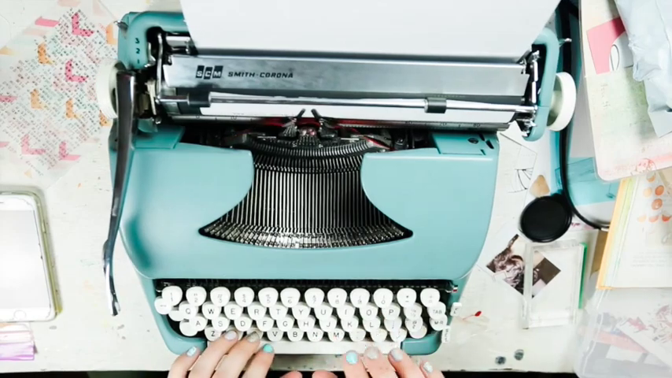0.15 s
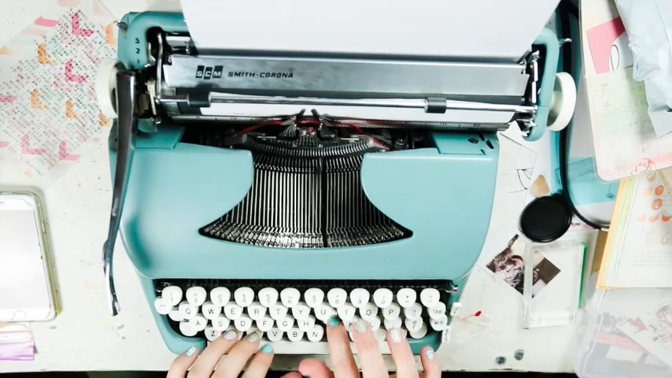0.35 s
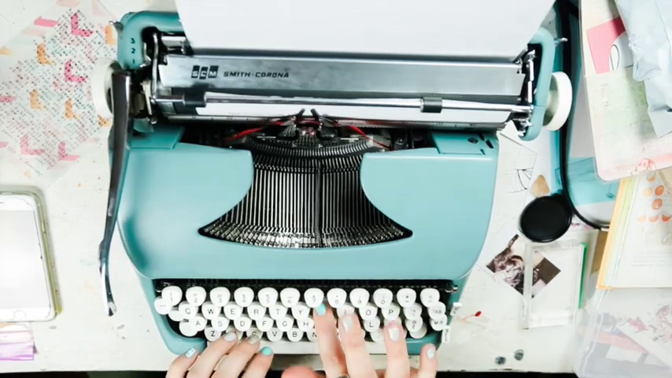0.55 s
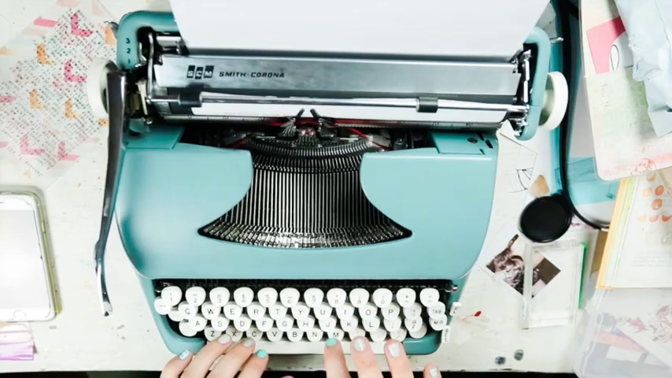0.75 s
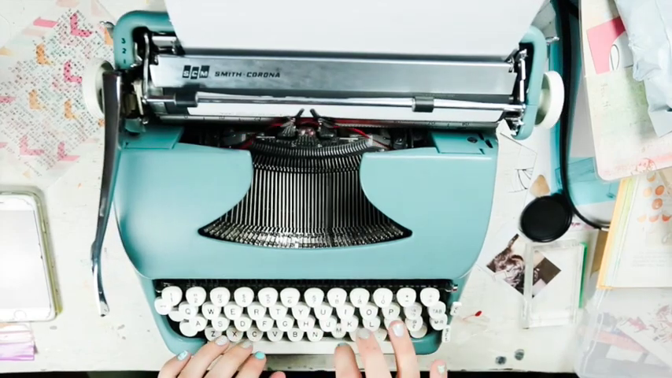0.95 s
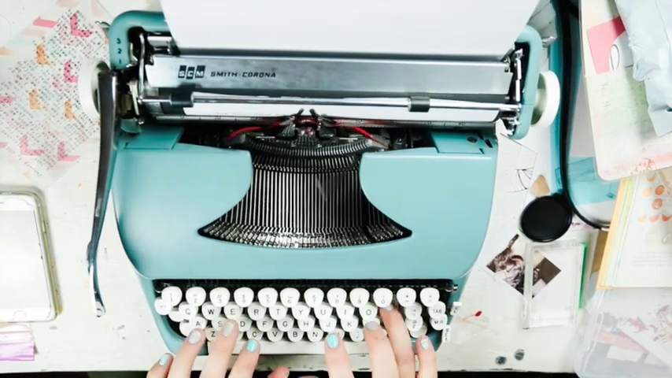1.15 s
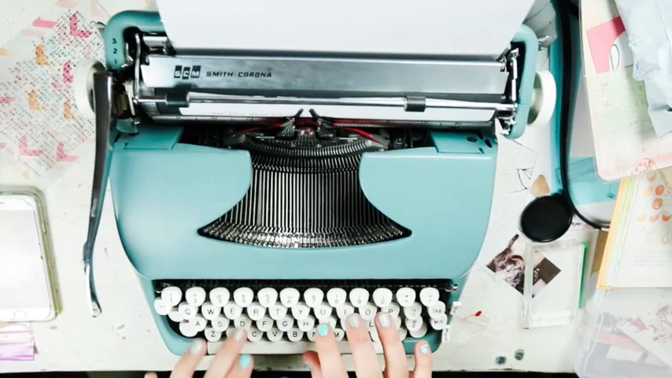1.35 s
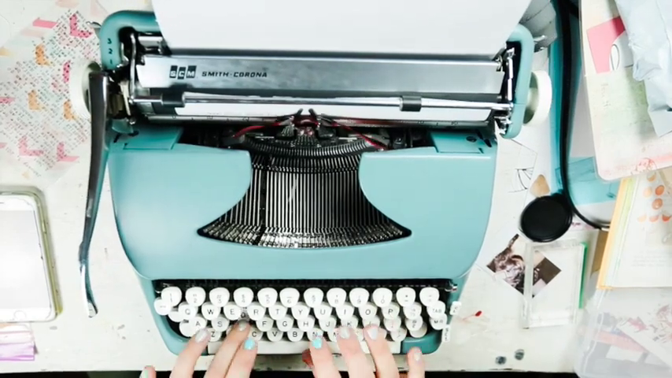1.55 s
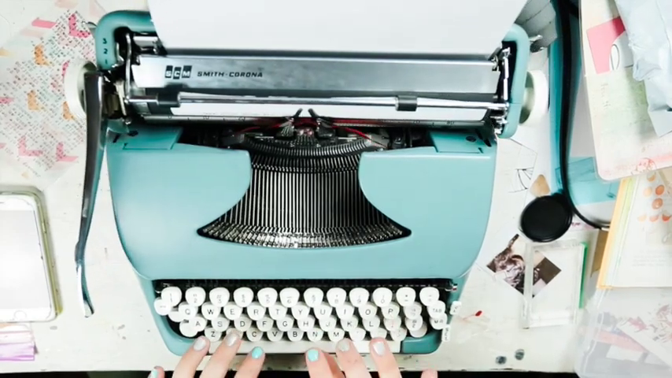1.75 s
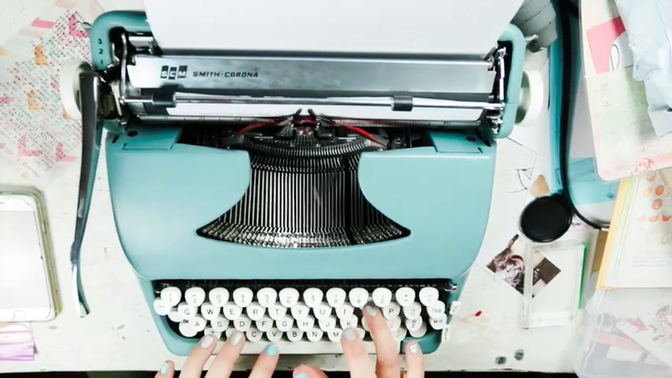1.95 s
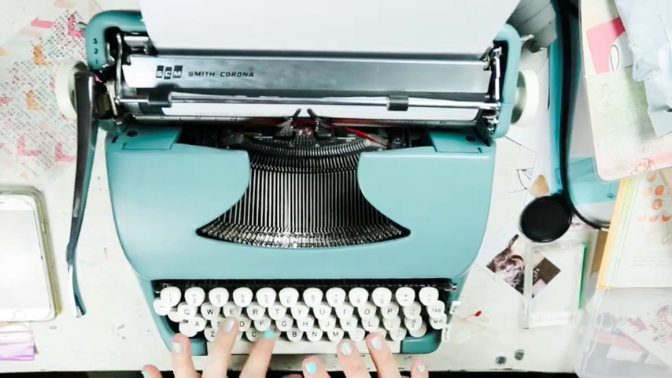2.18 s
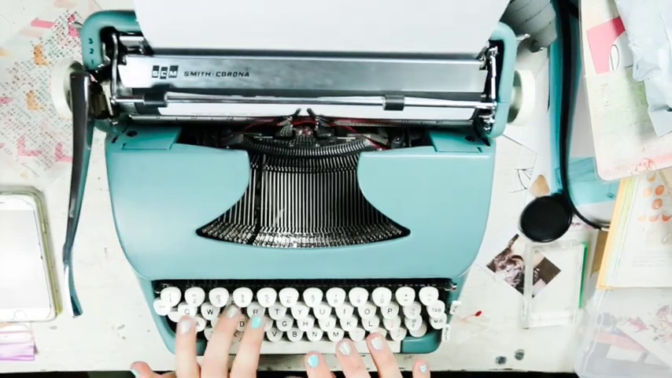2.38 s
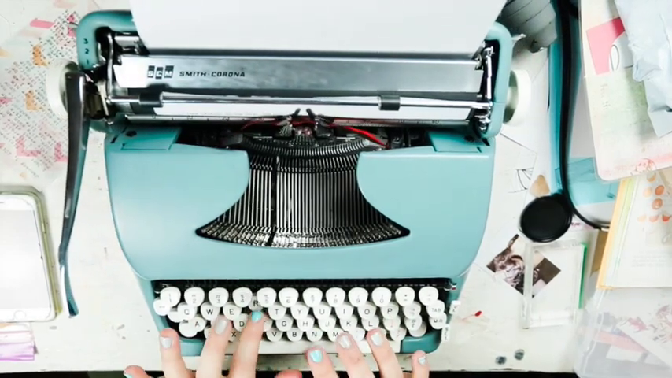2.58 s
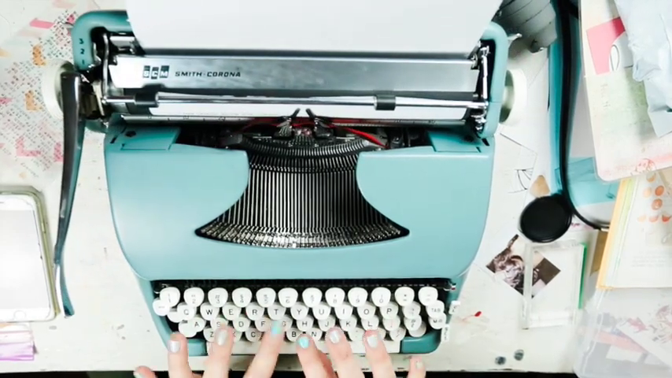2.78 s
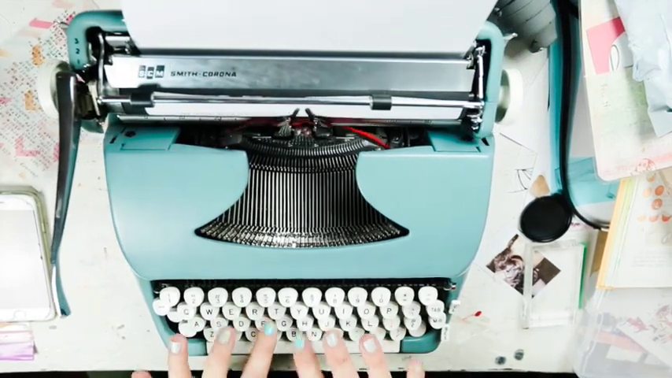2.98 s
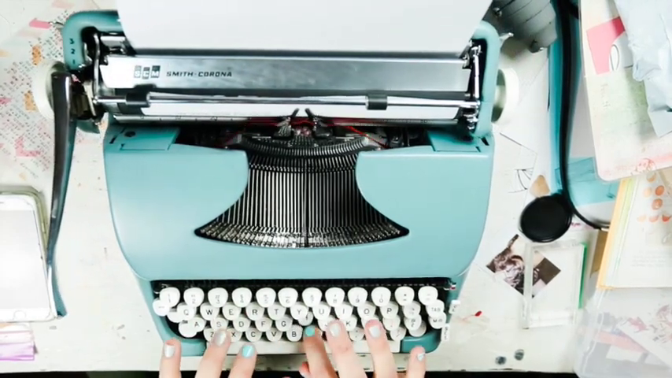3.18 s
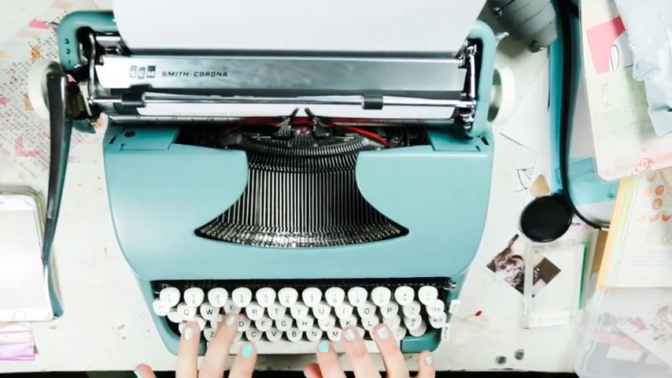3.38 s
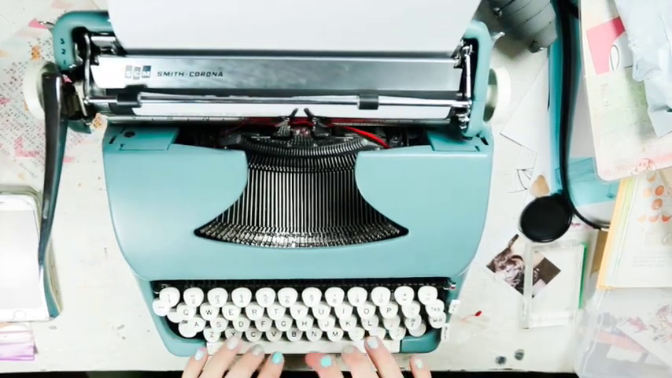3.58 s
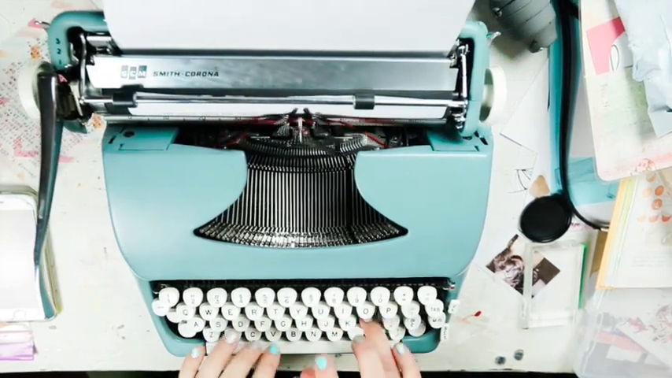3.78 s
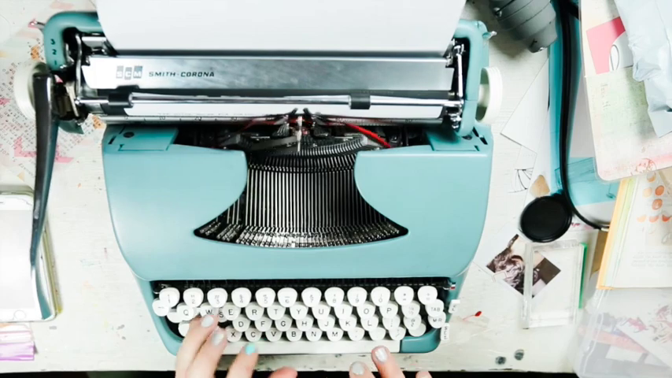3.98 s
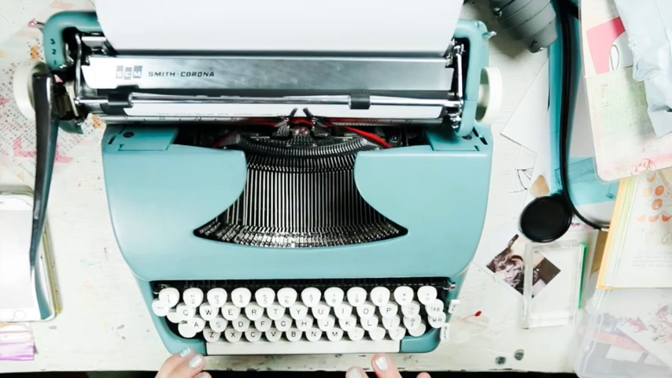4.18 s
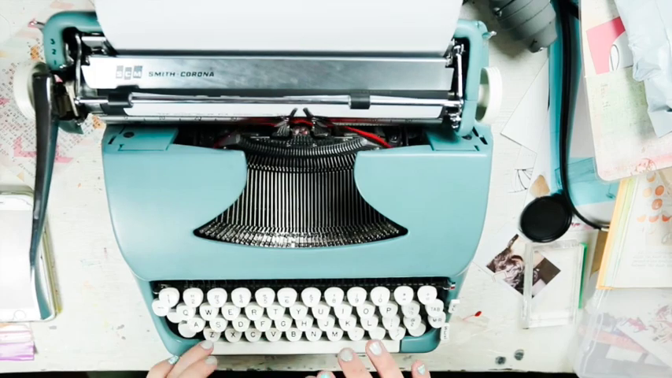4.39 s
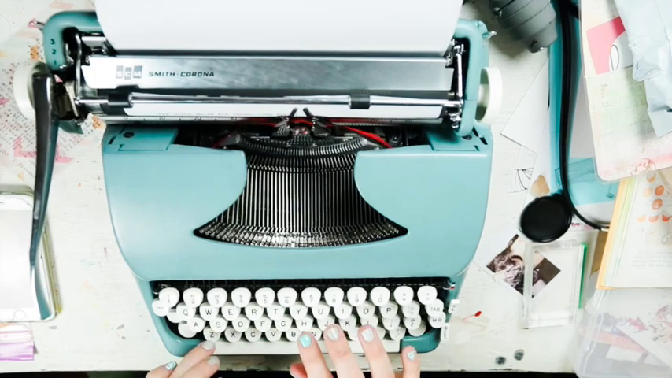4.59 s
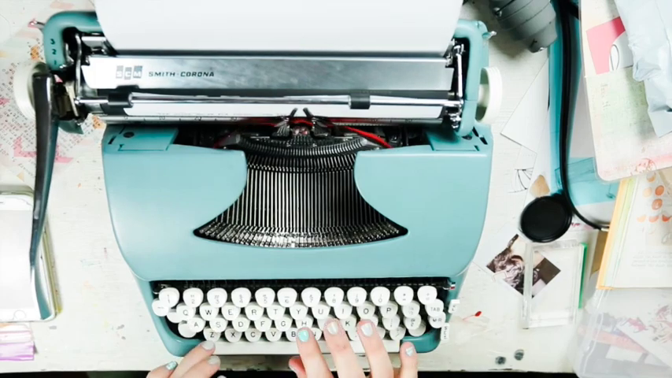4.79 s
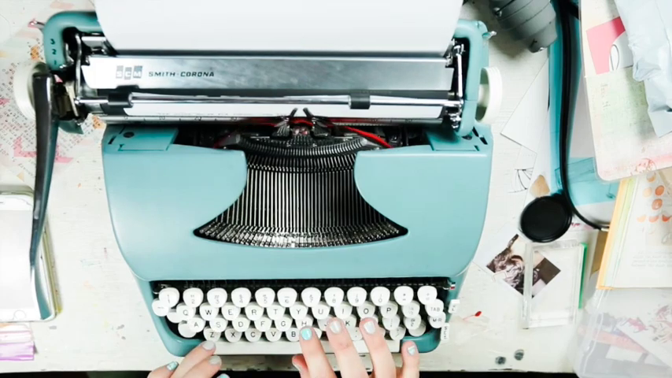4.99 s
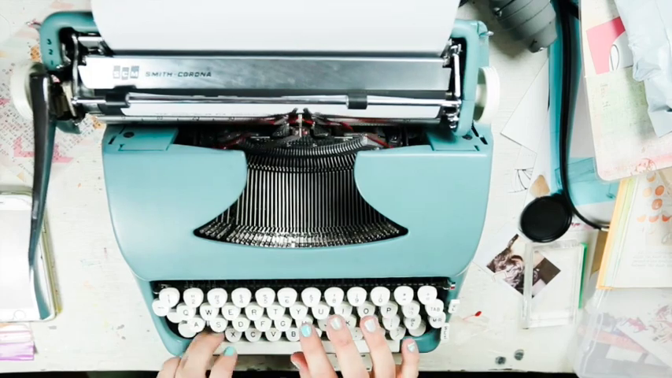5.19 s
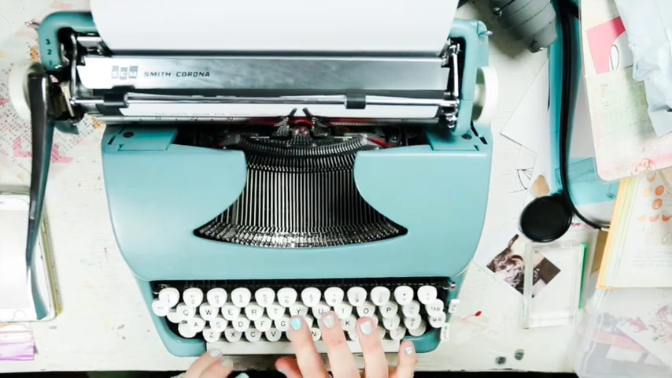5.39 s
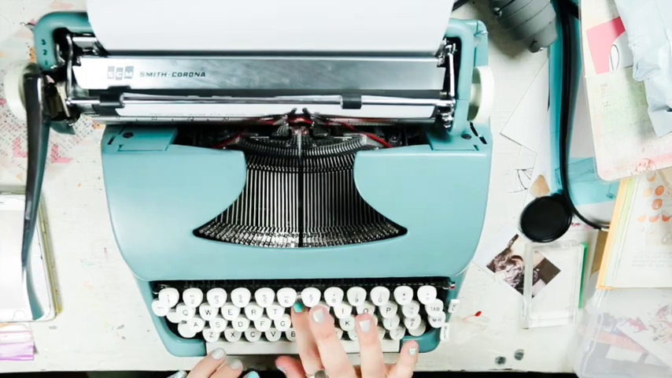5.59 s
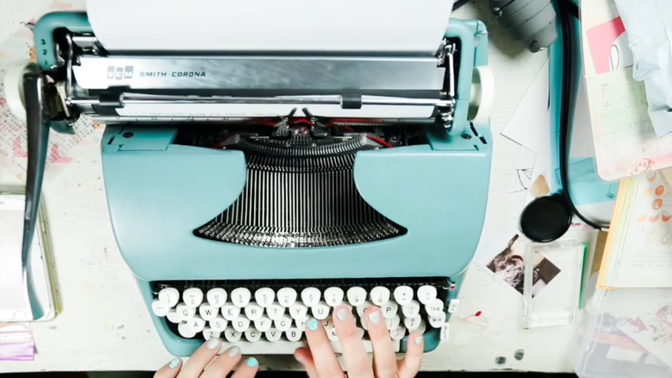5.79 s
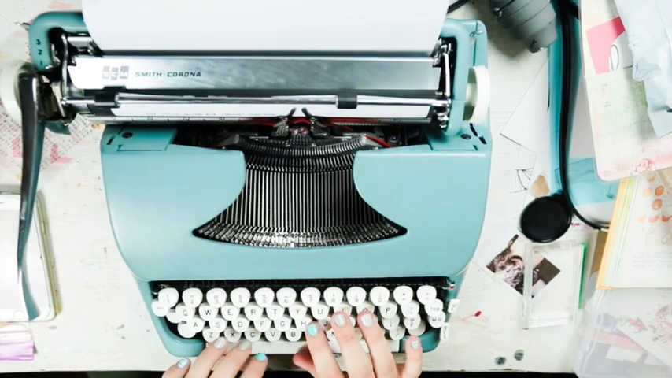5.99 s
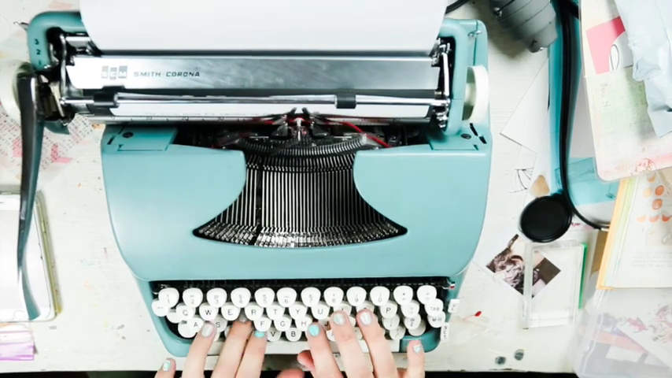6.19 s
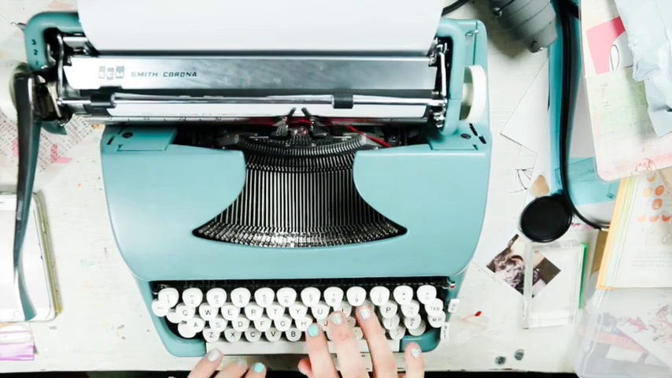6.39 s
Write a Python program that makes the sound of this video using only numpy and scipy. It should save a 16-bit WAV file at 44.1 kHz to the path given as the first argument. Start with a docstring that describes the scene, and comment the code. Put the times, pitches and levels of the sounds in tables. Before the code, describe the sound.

A manual typewriter typed in quick, even runs, each letter a sharp steel crack with lever rattle and a thin metallic shimmer, close in a quiet room.

```python
"""A desk in a quiet room: a portable manual typewriter is typed on in quick runs, heard from close by.
For each letter, loose key levers rattle (random tiny contacts) and a typebar swings up and cracks on the
platen (a smeared click). The basket of steel bars rings on (many close tones), the carriage steps and the
bar drops back. Knocks of the case, thin squeaks and room reflections join in.
The cracks overload the microphone; faint rumble, hum and hiss (shaped noise) fill the pauses."""
import sys
import numpy as np
from scipy import signal
from scipy.fft import rfft, irfft
from scipy.io import wavfile
from scipy.ndimage import uniform_filter1d

SR = 44100
rng = np.random.default_rng(int(sys.argv[2]) if len(sys.argv) > 2 else 0)


def generate_wav(signal):
    """Clip the signal to [-1, 1] and save it as 16-bit WAV at the path in sys.argv[1]."""
    frames = np.transpose(np.atleast_2d(signal))
    scaled = np.clip(frames, -1, 1) * 32767
    pcm = np.round(scaled).astype(np.int16)
    wavfile.write(sys.argv[1], SR, pcm)


N = 284445

# All levels in the tables are relative: the functions add their own gains.
# spectrum of the low rumble: pitch_hz, level_db
RUMBLE_COLOUR = [(25, -38.5), (50, -5), (75, 8.5), (105, 16), (140, 6), (165, 1), (200, -14.5), (290, -30),
                 (345, -9.5), (420, -21.5), (900, -38.5)]
# spectrum of the hiss: pitch_hz, level_db
HISS_COLOUR = [(100, 0.5), (570, 0.5), (900, -2), (2000, -3), (5000, -8), (10000, -11.5), (16000, -17)]
# rise and fall of the rumble: time_s, level_db
RUMBLE_LEVEL = [(0.0, -71.5), (0.68, -63.5), (1.6, -67), (1.94, -64), (2.39, -72), (3.68, -67), (4.51, -71),
                (4.72, -65.5), (5.89, -63), (6.07, -51), (6.23, -60), (6.45, -71)]
# rise and fall of the hiss: time_s, level_db
HISS_LEVEL = [(0, -77.5), (.35, -72), (2, -62), (4.2, -71), (4.45, -83.5), (4.85, -74.5), (5.5, -63.5),
              (5.85, -72), (6.45, -72)]
# wavering hum that follows the rumble: pitch_hz, width_hz, level_db
HUM = [(145, 16, -3), (329, 5, -14), (368, 14, -15), (570, 5, -18)]
# how long the room rings: pitch_hz, t60_s (time to drop by 60 dB)
ROOM_T60 = [(100, 0.45), (1000, 0.64), (5000, 0.53), (15000, 0.22)]
# faint thin squeaks: start_s, length_s, pitch_hz, level_db
SQUEAKS = [(4.72, .16, 1230, -82), (4.8, .19, 2125, -72), (4.84, .19, 1965, -75), (5.72, .24, 4620, -68)]
# tones of the case on the desk: pitch_hz, level_db, t60_s
CASE = [(80, -1, 0.14), (111.7, 2.5, 0.2), (135.2, -1, 0.11), (181, -3, .1), (230, -1.5, .08),
        (384, -6, 0.073), (533.4, 0, 0.14), (574.7, -1.5, 0.16)]
# tones of the stopping carriage: pitch_hz, level_db, t60_s
CARRIAGE = [(520, -3, .08), (575, 0, .11), (630, -4, .07), (115, -2, .18)]
# tones of the steel frame and panels: pitch_hz, level_db, t60_s
FRAME = [(590, -45, .09), (690, -46, .05), (1317, -55, .07), (1517, -49, .08), (1917, -53, .06),
         (2526, -51, .07), (2906, -51, .07), (3290, -46, .07), (3944, -51, .07), (4437, -48, .05)]
# tones of typebar, type guide and platen: pitch_hz, level_db, t60_s
GUIDE = [(6453, -18.5, 0.029), (6560, -27.5, 0.034), (7210, -22.5, 0.026), (7760, -16, .016),
         (8580, -31, 0.03), (8880, -27.5, 0.019), (11600, -18, 0.0075), (14120, -34, .014)]
# spectrum of the lever contacts: pitch_hz, level_db
RATTLE_COLOUR = [(60, -6.5), (300, -7), (600, 4.5), (950, -0.5), (1600, 5), (2600, 6.5), (4500, 3),
                 (7000, 2.5), (10000, -2), (13000, -5.5), (16000, -14)]
# spectrum of the short ticks: pitch_hz, level_db
TICK_COLOUR = [(1000, -19), (4000, -24), (7000, 4), (10000, 3.5), (14500, 3), (16000, 0)]
# spectrum of the blow on the platen: pitch_hz, level_db
CRACK_COLOUR = [(60, -32.5), (300, -21.5), (750, -6), (1200, -15.5), (2600, -1.5), (5000, 1.5),
                (6500, 11.5), (8200, 13.5), (10000, 6.5), (13000, 3), (16000, 0.5)]
# spectrum of the basket of typebars, also of the buzzing type: pitch_hz, level_db
BASKET_COLOUR = [(4000, -23.5), (5800, -10.5), (6500, -1), (7400, 0.5), (8400, -4), (9300, -6),
                 (11500, -10.5), (15000, -25.5)]
# one row per letter, timed by its blow on the platen; travel_s is how long before it the key moves:
# blow_s, force_db, travel_s, key_rattle_db, swing_s, swing_rattle_db
LETTERS = [(.438, 3, .054, -44.5, 0.016, -34), (0.6478, 2.5, 0.045, -54.5, 0.013, -38.5),
           (0.8949, 0, 0.051, -53.5, .023, -44), (1.108, 0.5, 0.051, -57, .012, -49),
           (1.3195, -2, 0.046, -55.5, 0.017, -48), (1.5171, -2.5, 0.038, -70, 0.024, -50),
           (1.933, -6.5, .061, -55.5, 0.023, -45), (2.1145, -1, 0.037, -59.5, 0.01, -41.5),
           (2.3307, -4, .052, -63, .008, -48), (2.5136, -1, 0.042, -63, 0.007, -48.5),
           (2.9056, -1, 0.042, -59.5, 0.0074, -45.5), (3.1206, -1.5, 0.04, -61, 0.019, -52),
           (3.3278, -.5, .036, -58, 0.012, -50.5), (3.7927, -0.5, 0.043, -56.5, 0.01, -49),
           (4.0225, -2, .054, -64.5, 0.015, -54.5), (5.2377, 6.5, .044, -47.5, 0.01, -37.5),
           (5.5714, 6, .049, -52, 0.018, -40), (6.2479, 7, 0.049, -49.5, .023, -37)]
# after each letter the typebar lands on its rest: land_s, rattle_db, tick_db
LANDINGS = [(.56, -51, -43), (.791, -51, -46), (1.022, -51.5, -43.5), (1.26, -50.5, -43),
            (1.473, -61.5, -60.5), (1.661, -57, -51), (2.064, -54, -42.5), (2.259, -56, -53),
            (2.483, -56, -50), (2.684, -57, -50), (3.05, -55.5, -45), (3.27, -55.5, -52.5),
            (3.499, -61.5, -75), (3.937, -55.5, -49.5), (4.177, -55, -50), (5.431, -50.5, -47),
            (5.749, -59.5, -59), (6.412, -49, -50)]
# space bar and other keys that print nothing, going down or coming up: start_s, rattle_db, thud_db
SPACES = [(1.732, -51, -55), (1.815, -51, -63), (1.963, -52, -53), (2.714, -52.5, -55), (2.804, -51.5, -62),
          (3.548, -52, -56), (3.62, -49.5, -62), (4.19, -55.5, -64), (5.887, -46.5, -55.5),
          (5.899, -44, -46.5), (5.932, -40.5, -44.5), (5.979, -50, -55.5), (6.02, -41.5, -54.5)]

T = np.arange(int(.7 * SR)) / SR  # time axis of one short sound, in seconds
CUTOFF_HZ = 16000
LEAD_S = .05  # the sound of a swing is placed this long before its blow
# the carriage stops one letter further on, this long after each blow
CARRIAGE_STOP_S, CARRIAGE_DB, CARRIAGE_THUD_DB = 0.028, -52.5, -58
# as a key is let go the escapement pawl springs back; the typebar lands FALL_S later
FALL_S, PAWL_DB, PAWL_RING_DB = .056, -50.5, -59
# a finger's thud on a key of average rattle, and the share of the rattle's variation that it follows
PRESS_THUD_DB, AVERAGE_KEY_DB, THUD_FOLLOWS = -58.5, -56, 0.66
LANDING_THUD_DB = -4  # relative to the rattle value in LANDINGS
# ticks, relative to the rattle values in LETTERS and SPACES
PRESS_TICK_DB, SPACE_TICK_DB = 8.5, -3.5
# thump and basket ring at a force of 0 dB, and their growth in dB per dB of force
THUMP_DB, THUMP_GROWTH = -53.5, 3.8
BASKET_DB, BASKET_GROWTH = -44, 0.32
# loose levers touch about this often, with this spread of strength
CONTACTS_PER_S, CONTACT_SPREAD_DB = 2800, 3.5


def from_db(db):
    """Turn decibels into a gain."""
    return 10 ** (np.asarray(db) / 20)


def unit(x):
    """Scale to an energy of one."""
    return x / np.sqrt(np.sum(x ** 2) + 1e-20)


def at_hz(points, hz):
    """Read a table between its points, with pitch on a log axis."""
    f, value = np.transpose(points)
    return np.interp(np.log(np.maximum(hz, 1)), np.log(f), value)


def fade(t60):
    """Smooth dying away, 60 dB down after t60 seconds."""
    return np.exp(-np.log(1000) * T / max(t60, 1e-4))


def add(out, s, sound):
    """Mix a sound in at time s."""
    i = max(int(round(s * SR)), 0)
    out[i:i + len(sound)] += sound[:max(N - i, 0)]


def through(x, response):
    """Pass a signal through an impulse response."""
    return signal.oaconvolve(x, response)[:len(x)]


def colour(points, size=4096):
    """Impulse response with the given spectrum, its energy as early as possible (minimum phase)."""
    level_db = at_hz(points, np.fft.rfftfreq(size, 1 / SR))
    cepstrum = irfft(np.log(from_db(level_db)))
    # folding the second half onto the first keeps the response from starting early
    cepstrum[1:size // 2] *= 2
    cepstrum[size // 2 + 1:] = 0
    return irfft(np.exp(rfft(cepstrum)))


def ring(modes, spread_db, detune=0, size=12000):
    """One blow on a set of fading tones; each draws its own strength, sign and any detuning."""
    t = T[:size].astype(np.float32)
    hz, db, t60 = np.array(modes, np.float32).T[:, :, None]
    hz = hz * (1 + detune * rng.normal(size=hz.shape)).astype(np.float32)
    sign = rng.choice([-1, 1], db.shape)
    strength = from_db(db + spread_db * rng.normal(size=db.shape)) * sign
    decay = np.exp(-float(np.log(1000)) * t / t60)
    return np.sum(strength * np.sin(2 * np.pi * hz * t) * decay, axis=0)


def chatter(envelope, per_s, spread_db):
    """Tiny metal contacts at random moments, with the energy of their envelope."""
    n = len(envelope)
    sizes = from_db(spread_db * rng.standard_normal(n)) * rng.choice([-1, 1], n)
    touching = rng.random(n) < per_s / SR
    return unit(sizes * touching * envelope) * np.sqrt(np.sum(envelope ** 2))


def burst(t60, rise):
    """Chatter that builds up quickly and dies away (both times in seconds)."""
    envelope = fade(t60) * (1 - np.exp(-T / max(rise, 1e-5)))
    return chatter(envelope, CONTACTS_PER_S, CONTACT_SPREAD_DB)


def hum():
    """Noise through narrow resonances gives soft tones that waver in pitch and level."""
    out = np.zeros(N)
    for hz, width, db in HUM:
        r = np.exp(-np.pi * width / SR)  # closer to 1 is narrower
        feedback = [1, -2 * r * np.cos(2 * np.pi * hz / SR), r * r]
        tone = signal.lfilter([1, 0, -1], feedback, rng.standard_normal(N))
        out += from_db(db) * tone / tone.std()
    return out


def background():
    """Low rumble, hum and soft hiss: shaped noise, slowly changing in level."""
    time = np.arange(N) / SR
    rumble_gain = from_db(np.interp(time, *np.transpose(RUMBLE_LEVEL)))
    hiss_gain = from_db(np.interp(time, *np.transpose(HISS_LEVEL)))
    rumble = through(rng.standard_normal(N), unit(colour(RUMBLE_COLOUR)))
    hiss = through(rng.standard_normal(N), unit(colour(HISS_COLOUR)))
    low = from_db(-4) * rumble + from_db(-0.5) * hum()
    return rumble_gain * low + hiss_gain * hiss


def room(x, size=32768):
    """Diffuse reflections that build up within a few milliseconds and die soonest in the treble."""
    edges = np.geomspace(60, 17000, num=9)  # Hz
    tail = 0
    for low, high in zip(edges, edges[1:]):
        band_filter = signal.butter(2, [low, high], "band", fs=SR, output="sos")
        band = signal.sosfilt(band_filter, rng.standard_normal(len(T)))
        tail = tail + band * fade(at_hz(ROOM_T60, np.sqrt(low * high)))
    return through(x, unit(tail * (1 - np.exp(-T / 0.0016))))


def squeaks():
    """Thin tones with a wavering pitch that swell and fade."""
    out = np.zeros(N)
    for s, length, hz, db in SQUEAKS:
        waver = 1 + .07 * uniform_filter1d(rng.standard_normal(len(T)), size=60)
        swell = np.sin(np.pi * np.minimum(T / length, 1)) ** 2
        tone = np.sin(2 * np.pi * hz * np.cumsum(waver) / SR)
        add(out, s, from_db(db) * swell * tone)
    return out


def knock(db):
    """One knock of the case against the desk sets the tones of the case ringing."""
    return from_db(db) * ring(CASE, spread_db=2, detune=.03)


def thuds():
    """Fingers, typebars and the stopping carriage knock the case; each blow shoves the whole machine."""
    knocks, shoves = np.zeros((2, N))
    push = T / .00035 * np.exp(1 - T / .00035)  # one smooth push, strongest after 0.35 ms
    for s, force_db, travel, key_db, *_ in LETTERS:
        add(knocks, s - travel, knock(PRESS_THUD_DB + THUD_FOLLOWS * (key_db - AVERAGE_KEY_DB)))
        # the platen passes the blow on to the whole machine
        add(shoves, s + 0.0011, from_db(THUMP_DB + THUMP_GROWTH * force_db) * push)
        stop = ring(CARRIAGE, spread_db=1.5, detune=.015)
        add(knocks, s + CARRIAGE_STOP_S, from_db(CARRIAGE_THUD_DB) * stop)
    for s, db, _ in LANDINGS:
        add(knocks, s, knock(db + LANDING_THUD_DB))
    for s, _, db in SPACES:
        add(knocks, s, knock(db))
    bass_cut = signal.butter(3, 62, "high", fs=SR, output="sos")
    return shoves + signal.sosfilt(bass_cut, knocks)


def pawl():
    """The escapement pawl rings briefly as it springs back, never at quite the same pitch."""
    out = np.zeros(N)
    for s, *_ in LANDINGS:
        hz = 3330 * (1 + .015 * rng.normal())
        steel = ring([(hz, 0, .13), (hz * 2.09, -3, .1)], spread_db=1)
        add(out, s - FALL_S + 0.01, from_db(PAWL_RING_DB) * steel)
    return out


def wind_up(swing):
    """Level of a typebar's rattle just before its blow: it grows as the bar speeds up."""
    progress = (T - LEAD_S) / max(swing, .002) + 1  # 0 as the bar sets off, 1 at the blow
    moving = (progress > 0) * (progress < 1)
    return moving * (.75 + .5 * progress)


def swinging(swing):
    """The dense, even rattle of a typebar on its way up."""
    return chatter(wind_up(swing), per_s=9000, spread_db=2)


def lever(contacts, size=12000):
    """Each lever adds its own quickly dying response to its contacts and passes them to the frame."""
    own = unit((T == 0) + .28 * chatter(fade(.008), per_s=20000, spread_db=1))[:size]
    frame = ring(FRAME, spread_db=1.5, detune=.004)
    response = through(own, colour(RATTLE_COLOUR, size=1024)) + frame
    return signal.fftconvolve(contacts[:size], response)


def linkage():
    """Loose levers rattle as keys move, typebars swing and fall back, and the carriage steps."""
    out = np.zeros(N)
    for s, force_db, travel, key_db, swing, swing_db in LETTERS:
        add(out, s - travel, lever(from_db(key_db + 8.0) * burst(t60=.24, rise=.0035)))
        add(out, s - LEAD_S, lever(from_db(swing_db + 2.5) * swinging(swing)))
        # the blow shakes the levers
        add(out, s, lever(from_db(force_db - 39) * burst(t60=0.047, rise=0.00037)))
        add(out, s + CARRIAGE_STOP_S, lever(from_db(CARRIAGE_DB) * burst(t60=0.22, rise=0.0027)))
    for s, db, _ in LANDINGS:
        add(out, s - FALL_S, lever(from_db(PAWL_DB) * burst(t60=.12, rise=0.0021)))
        add(out, s, lever(from_db(db + 7) * burst(t60=.15, rise=.0021)))
    for s, db, _ in SPACES:
        add(out, s, lever(from_db(db + 7.5) * burst(t60=0.11, rise=0.0016)))
    return out


def latches():
    """Short bright ticks mark key movements and landings; the swinging bar scrapes in its slot."""
    out = np.zeros(N)
    for s, _, travel, key_db, swing, swing_db in LETTERS:
        add(out, s - travel, from_db(key_db + PRESS_TICK_DB) * burst(t60=.055, rise=.001))
        add(out, s - LEAD_S, from_db(swing_db - 1.5) * swinging(.75 * swing))
    for s, _, db in LANDINGS:
        add(out, s, from_db(db + 5.5) * burst(t60=0.055, rise=.00072))
    for s, db, _ in SPACES:
        add(out, s, from_db(db + SPACE_TICK_DB) * burst(t60=0.05, rise=.00072))
    return through(out, colour(TICK_COLOUR))


def basket(count=260):
    """Every blow shakes all the resting typebars: a shimmer of close, slightly different steel tones."""
    crowded = rng.uniform(6200, 8700, count // 2)
    scattered = rng.uniform(4000, 15000, count // 2)
    pitches = np.concatenate([crowded, scattered])  # Hz
    bars = np.exp(2j * np.pi * pitches[:, None] * T).astype(np.complex64)
    out = np.zeros(N)
    for s, force_db, *_ in LETTERS:
        shares = unit(from_db(at_hz(BASKET_COLOUR, pitches)) * rng.rayleigh(1, count))
        phases = np.exp(2j * np.pi * rng.random(count))
        shaken = (shares * phases).astype(np.complex64)
        gain = from_db(BASKET_DB + BASKET_GROWTH * force_db)
        add(out, s, gain * (shaken @ bars).real * fade(t60=0.48))
    return out


def bending_wave(spread_s, size=512):
    """A click that has run along a steel bar: the treble arrives first, the bass last."""
    hz = np.fft.rfftfreq(size, 1 / SR)
    delay = spread_s * (1 - hz / hz[-1])
    return irfft(np.exp(-2j * np.pi * np.cumsum(delay) * hz[1]))


def cracks():
    """The type slug hits the platen, buzzes against it and rings the type guide; hard clicks last longer."""
    contact, buzz, guide = np.zeros((3, N))
    for s, force_db, *_ in LETTERS:
        force = from_db(force_db)
        add(contact, s - .0004, force * 0.56 * bending_wave(0.0013 * np.sqrt(force)))
        add(contact, s + 0.00036, force * 0.063 * chatter(fade(0.014), per_s=21000, spread_db=3.5))
        # buzz and ring grow more slowly with force
        add(buzz, s + 0.0029, np.sqrt(force) * 0.071 * chatter(fade(0.03), per_s=6900, spread_db=4))
        add(guide, s + .0004, np.sqrt(force) * from_db(-8.0) * ring(GUIDE, spread_db=2.5))
    return through(contact, colour(CRACK_COLOUR)) + through(buzz, colour(BASKET_COLOUR)) + guide


def scene():
    """The machine, its room and the background, added together."""
    action = linkage() + latches() + pawl() + thuds()
    blows = cracks()
    reflections = room(from_db(-15.0) * action + from_db(-22.5) * blows)
    return (action + blows + basket() + squeaks() + reflections + background())[None]


def record(dry):
    """Overload flattens the cracks; the highest treble is cut."""
    clipped = dry / (1 + (dry / .29) ** 4) ** (1 / 4)  # peaks level off towards 0.29
    treble_cut = signal.ellip(10, .1, 70, CUTOFF_HZ, fs=SR, output="sos")
    return signal.sosfilt(treble_cut, clipped)


dry = scene()
out = record(dry)
generate_wav(out)
```